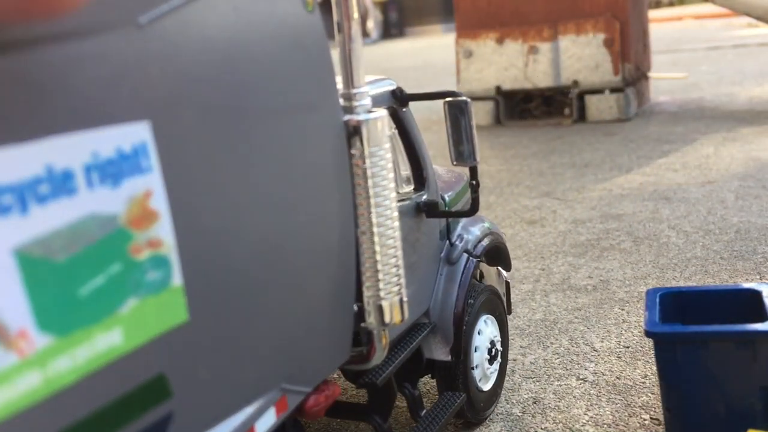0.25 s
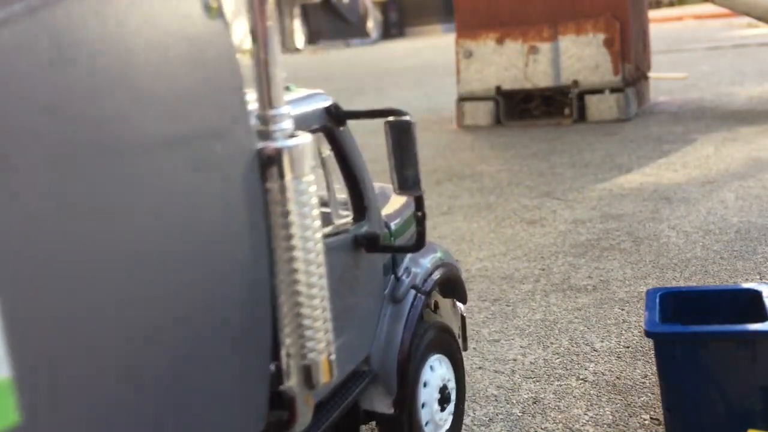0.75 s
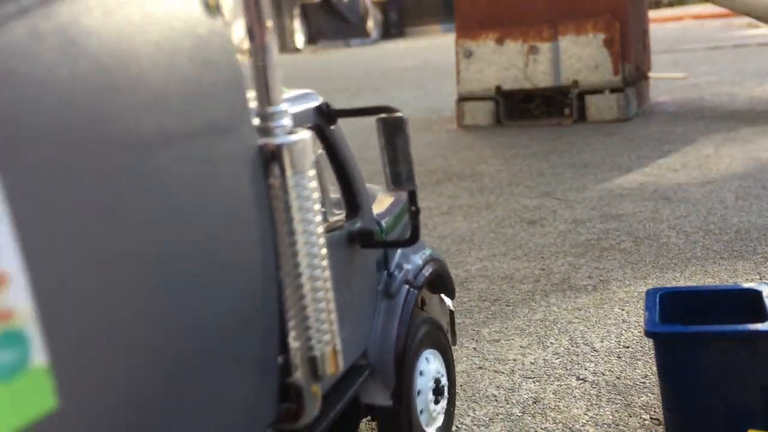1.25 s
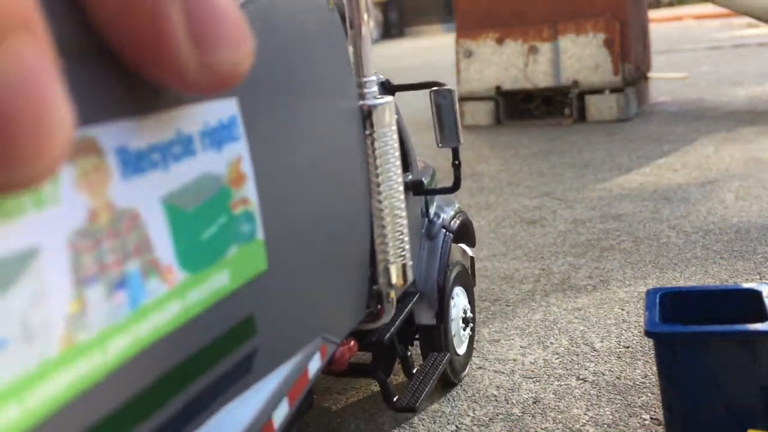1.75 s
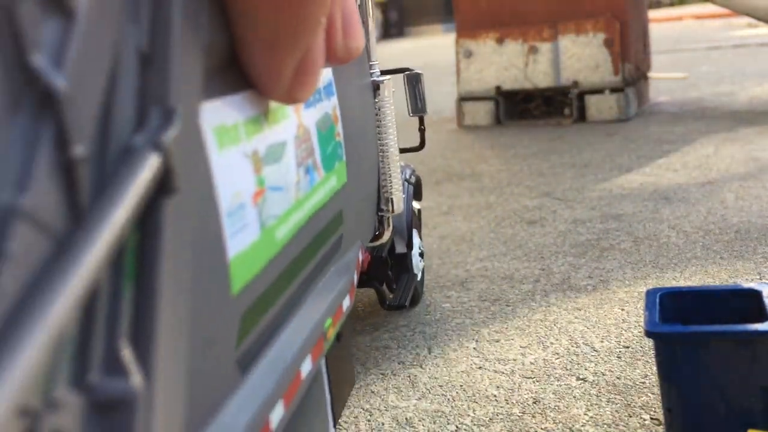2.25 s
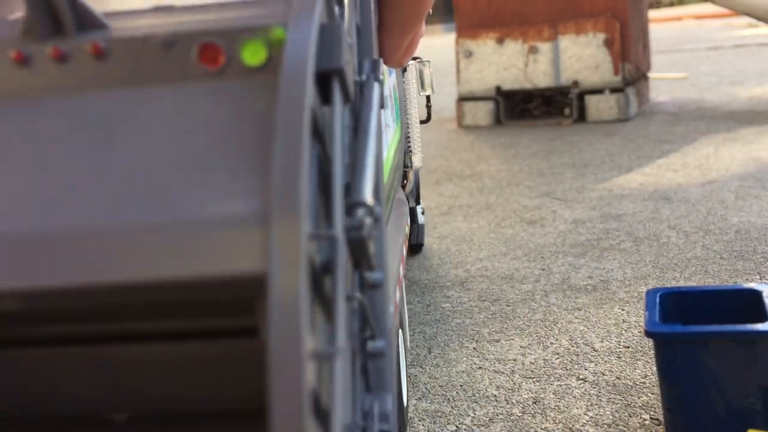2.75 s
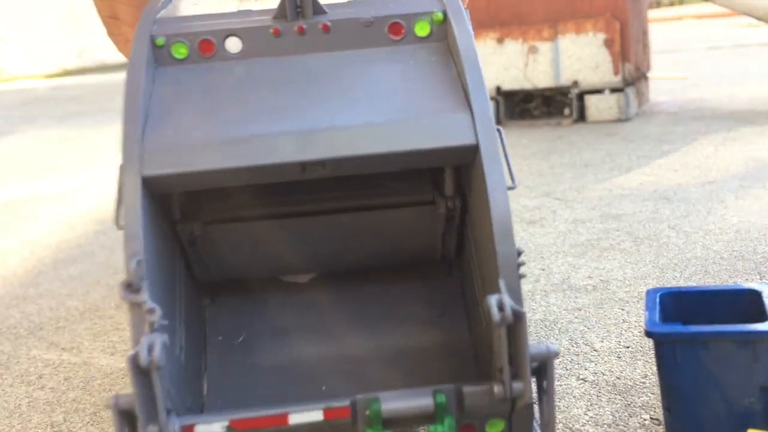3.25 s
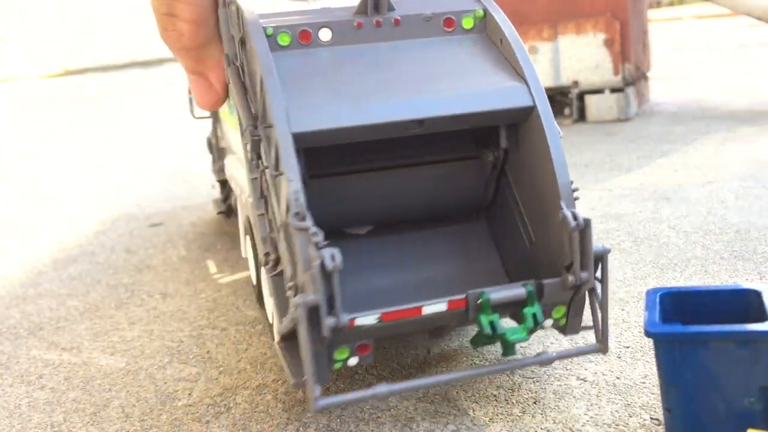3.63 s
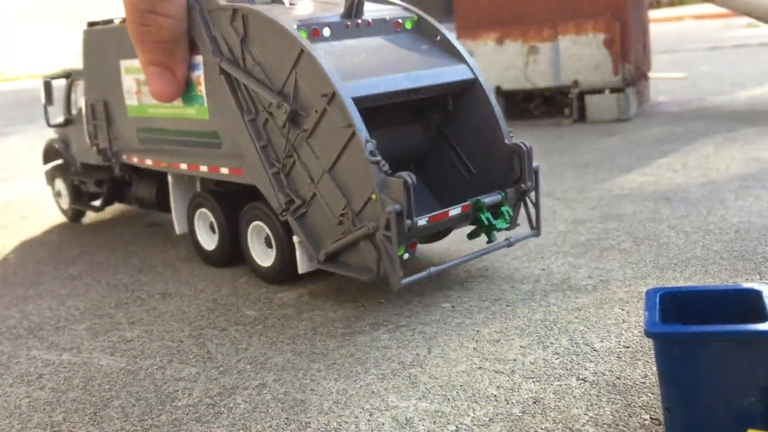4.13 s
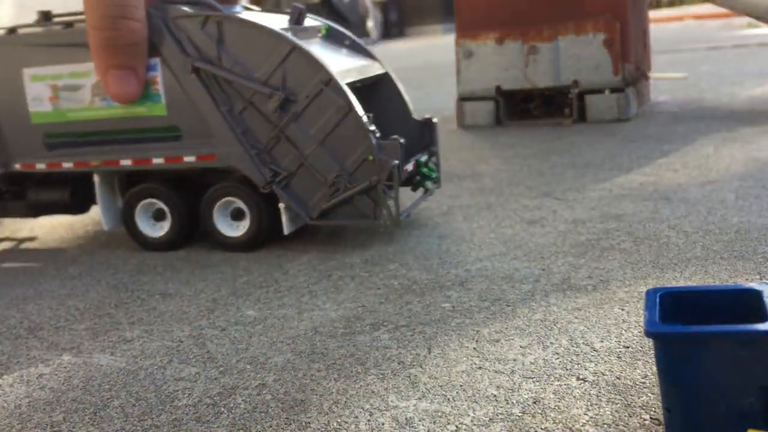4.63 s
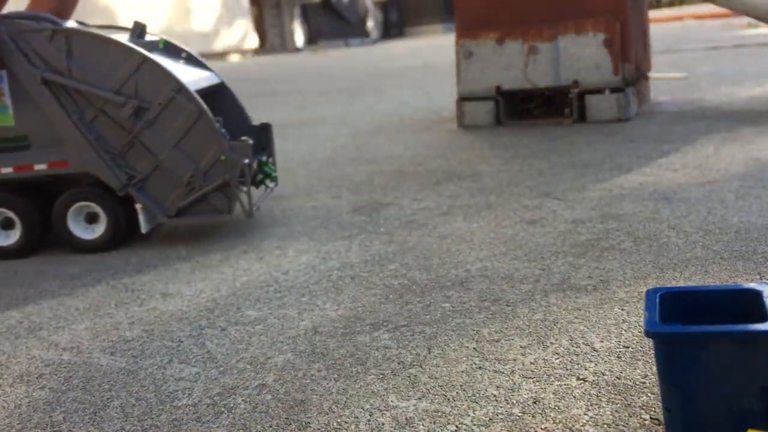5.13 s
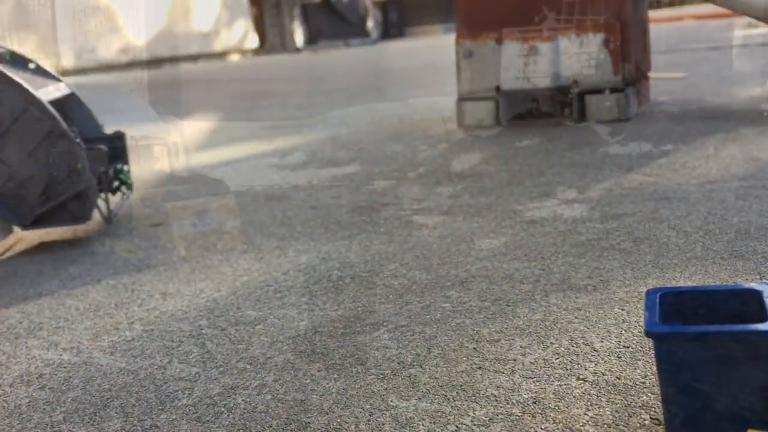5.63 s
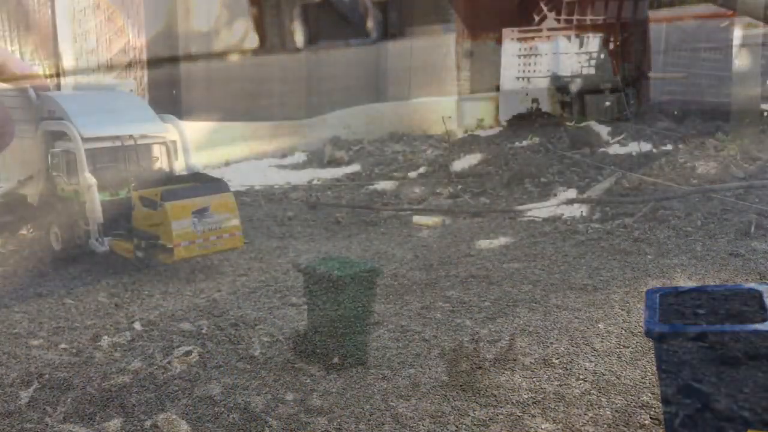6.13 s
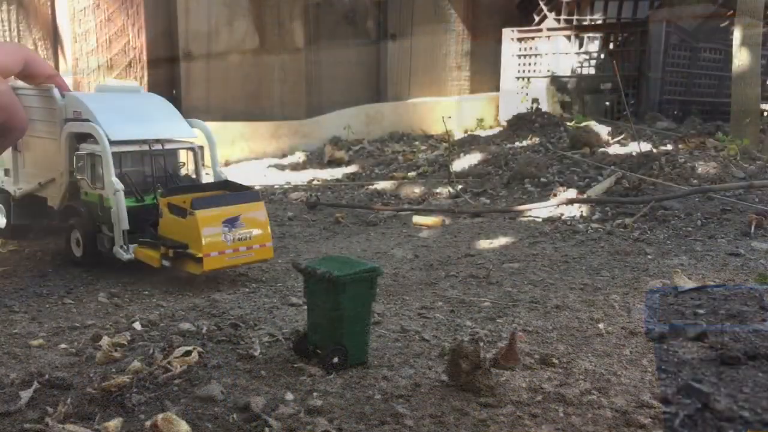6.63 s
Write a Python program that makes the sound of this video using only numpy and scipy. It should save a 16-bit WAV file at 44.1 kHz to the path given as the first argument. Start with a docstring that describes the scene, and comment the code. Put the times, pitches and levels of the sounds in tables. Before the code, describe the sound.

Close microphone, open air. Small isolated ticks break a soft rumbling background, then a brief loud clatter of hollow metal and plastic as the toy truck is shoved. Low finger thumps, soft rubbing and loose parts ticking come next. Several uneven, crunchy rolling strokes over concrete follow with gaps between, losing body as the truck recedes, until only faint knocks and distant hum remain.

```python
"""Outdoors on rough concrete, a diecast toy truck is gripped, turned and pushed in short strokes near the microphone.
Random grit clicks crunch through the resonances of its hollow body; bursts of tiny contacts make it jolt.
Loose fittings tick and single damped modes ping; handling gives dull low thumps, fingers and tyres rub softly.
Behind it lie a lumpy low rumble, a distant wash and wavering machine hums, all shaped from noise and sines."""
import sys
import numpy as np
from scipy import signal
from scipy.fft import rfft, irfft
from scipy.io import wavfile
from scipy.ndimage import uniform_filter1d

SR = 44100
rng = np.random.default_rng(int(sys.argv[2]) if len(sys.argv) > 2 else 0)


def put_to_file(sound):
    """Save the sound as 16-bit audio at rate SR, in the file named by the first command-line argument."""
    columns = np.atleast_2d(sound).T  # one column per channel
    safe = np.clip(columns, -1, 1)
    whole_steps = np.round(safe * 32767)
    wavfile.write(sys.argv[1], SR, whole_steps.astype(np.int16))


N = 303488
TIME = np.arange(N) / SR  # s
LEAD_S = 1 / 40  # room for the swell before each contact (s)

# broad colour of the truck's hollow body: (frequency [Hz], relative level [dB])
BODY_COLOUR = [(120, -20.5), (270, -21), (345, -8), (680, -7.5), (840, -16), (1050, -3), (1550, -11),
               (1850, -14), (3700, -14), (4900, -28.5), (5700, -21), (8500, -23), (10500, -31),
               (16000, -33)]
# resonances standing on that colour: (frequency [Hz], width [Hz], lift [dB])
BODY_RESONANCES = [(369.2, 37, 9), (494.5, 12, 7), (672, 47, 2.5), (788, 10, -1.5), (996, 110, 3.5),
                   (1154, 22, 2.5), (1593, 76, 6), (1950, 40, 1), (2470, 250, 0.5), (3250, 140, 4),
                   (3730, 88, 1.5), (4330, 99, 9), (5440, 260, 7.5), (6780, 320, 3), (7930, 360, -8.5)]


def amp(db):
    """Decibels to gain."""
    return 10 ** (np.asarray(db) / 20)


def unit(x):
    """Scales to rms 1."""
    return x / np.sqrt(np.mean(x ** 2) + 1e-20)


def peaked(x, size=256):
    """Scales so that the loudest few milliseconds have rms 1."""
    return x / np.sqrt(uniform_filter1d(x ** 2, size).max() + 1e-20)


def over_time(rows):
    """Gain at every sample from (time [s], level [dB]) rows."""
    return amp(np.interp(TIME, *np.transpose(rows)))


def spells(rows, rise_db_per_s, fall_db_per_s, sag_db_per_s=0):
    """Summed gain of (start [s], end [s], level [dB]) movements: each swells, holds or sags, and dies away."""
    total = 0
    for start, end, db in rows:
        rise = rise_db_per_s * np.maximum(start - TIME, 0)
        fall = fall_db_per_s * np.maximum(TIME - end, 0)
        # the listed level is reached midway through a sag
        sag = sag_db_per_s * (np.clip(TIME, start, end) - (start + end) / 2)
        total = total + amp(db - rise - fall - sag)
    return total


def add(mix, s, sound):
    """Lays a sound into the mix at time s."""
    part = mix[max(round(s * SR), 0):][:len(sound)]
    part += sound[:len(part)]


def band(x, lo_hz, hi_hz, order=3):
    """Causal band-pass."""
    edges_hz = [lo_hz, min(hi_hz, SR / 2 - 100)]
    return signal.sosfilt(signal.butter(order, edges_hz, "band", fs=SR, output="sos"), x)


def drift(per_s):
    """Smooth chance of rms 1 that changes about per_s times a second."""
    hz = np.fft.rfftfreq(N, 1 / SR)
    return unit(irfft(rfft(rng.standard_normal(N)) * np.exp(-(hz / per_s) ** 2), N))


def ring(colour, modes=(), size=4096):
    """Minimum-phase impulse response of a broad colour with resonances standing on it, at unit energy."""
    hz = np.fft.rfftfreq(size, 1 / SR)
    colour_hz, colour_db = np.transpose(colour)
    db = np.interp(np.log(hz + 1), np.log(colour_hz), colour_db)
    for centre, width, lift in modes:
        db = db + lift / (1 + (2 * (hz - centre) / width) ** 2)
    log_gain = np.log(amp(np.r_[db, db[-2:0:-1]]))
    # the Hilbert transform of the log gain gives the phase that makes it causal
    response = np.fft.ifft(np.exp(np.conj(signal.hilbert(log_gain)))).real
    return response / np.linalg.norm(response)


def grit(per_s, spread_db):
    """Random clicks of either sign, mostly small and a few large."""
    sizes = amp(spread_db * np.minimum(rng.exponential(1, N), 4)) * rng.choice([-1, 1], N)
    return sizes * (rng.random(N) < per_s / SR)


def rolling(pushing, soft_hz=2500, crisp_db=-9, bumpy_db=2.5):
    """Grit under the wheels sounds through the resonant body, in uneven clumps."""
    grains = grit(per_s=1300, spread_db=1.5) * amp(bumpy_db * drift(71))
    # the tyres soften most contacts; a little stays crisp
    cushioned = band(grains, 100, soft_hz, order=1) + amp(crisp_db) * grains
    crunch = signal.fftconvolve(cushioned, ring(BODY_COLOUR, BODY_RESONANCES))[:N]
    return pushing * unit(crunch)


def jolts(bumping, count=24):
    """Many separate hard jolts of the body over the steady bumping of the wheels."""
    # hardest jolts: (time [s], peak level at 700-2000 Hz [dB], treble relative to that [dB])
    hard_jolts = [(2.115, -31, 0.5), (2.129, -24.5, -20.5), (2.144, -21, -5.5), (2.152, -19, -5),
                  (2.177, -17.5, 0), (2.202, -17.5, -6.5), (2.223, -20, -6), (3.447, -34.5, -5),
                  (3.466, -36, -20), (3.5, -33.5, -7.5), (3.668, -29.5, -13), (3.684, -30, -7),
                  (3.701, -24, -2.5), (3.754, -29, 0), (3.789, -19.5, -6.5), (3.848, -25.5, -7),
                  (3.88, -28, -10.5), (3.901, -25.5, -6), (3.926, -31, 1), (3.945, -26, -1.5),
                  (3.969, -27.5, -4), (3.998, -21, -2), (4.075, -24, 2), (4.32, -24, -8), (4.347, -30.5, 3),
                  (4.377, -25.5, 0.5), (4.401, -26.5, -1.5), (4.416, -32.5, -5.5), (4.446, -34.5, -8.5),
                  (4.523, -30.5, -13.5), (4.542, -25, -8.5), (4.576, -22.5, -7), (4.612, -21, -3.5),
                  (4.652, -20, -6.5), (4.738, -27.5, 0.5), (5.065, -31.5, -10.5), (5.107, -24.5, -4.5),
                  (5.127, -22, -6), (5.158, -24.5, -5), (5.195, -28.5, -2.5), (5.472, -35, -17),
                  (5.498, -27.5, -10), (5.523, -28, -12), (5.669, -29.5, -10.5), (5.697, -28, -4),
                  (5.718, -27, -7.5), (5.761, -27.5, -12.5), (5.787, -30, -4), (5.811, -32.5, -10)]
    bump_treble_db, bump_db = -7.5, 1.5  # treble relative to the middle; bumps relative to the crunch
    bumps = [jolt(bump_treble_db) for _ in range(count)]
    out = rattle(bumps, bumping * amp(bump_db), gap_s=.019, jitter=.25, spread_db=1, listed_hits=hard_jolts)
    for s, db, treble_db in hard_jolts:
        add(out, s - LEAD_S, amp(db) * jolt(treble_db))
    return out


def jolt(treble_db, bass_db=-6, decay_ms=5.04):
    """A bump shakes the loose metal and plastic against the body, at a different spot each time."""
    body = ring(BODY_COLOUR, struck(BODY_RESONANCES, spread_db=1.0, stray_db=2.5))
    bass_force = chatter(rise_ms=0.67, decay_ms=decay_ms * 2.4, tail_db=-10, tail_ms=28)
    middle_force = chatter(rise_ms=2.0, decay_ms=decay_ms, tail_db=-17.5, tail_ms=22)
    treble_force = chatter(rise_ms=0.44, decay_ms=decay_ms * 0.88, tail_db=-32.5, tail_ms=69)
    bass = band(signal.fftconvolve(bass_force, body), 150, 670)
    middle = peaked(band(signal.fftconvolve(middle_force, body), 695, 2000))
    treble = band(signal.fftconvolve(treble_force, body), 2000, 17000)
    sides = amp(bass_db) * unit(bass) + amp(treble_db) * unit(treble)
    return middle + middle.std() * sides


def receding(x, boom_hz=450):
    """The body's lowest resonances follow its nearness to the microphone."""
    # boom of the body, thinner when farther off: (time [s], level [dB])
    nearness = [(2.2, 2.5), (3.5, 0.5), (3.9, 0.5), (4.5, -4.5), (5.1, -5.5), (5.8, -3.5)]
    boom = signal.sosfiltfilt(signal.butter(4, boom_hz, fs=SR, output="sos"), x)
    return x + boom * (over_time(nearness) - 1)


def ticks(turning, count=16):
    """Separate ticks of the loose fittings, clear to very faint, and random faint ticks during turns."""
    # separate ticks: (time [s], peak level at about 1300-5000 Hz [dB], treble relative to that [dB])
    separate_ticks = [(1.0373, -32.5, -7), (1.179, -44, -15), (1.8653, -49, -15), (1.8842, -42, -14),
                      (1.9401, -44.5, -16), (1.906, -35.5, -3), (2.0114, -42, -14.5), (2.5945, -48.5, -10),
                      (2.648, -38, -8), (2.6697, -40, -7), (2.6862, -38, -0.5), (3.1868, -41.5, -11),
                      (3.2625, -38, -16), (3.321, -41.5, -12), (3.3497, -41.5, -6), (3.624, -38.5, -37),
                      (3.6465, -40.5, -26.5), (4.173, -39.5, -4.5), (4.227, -34.5, -12.5),
                      (4.903, -66, -28), (4.9475, -45.5, -27), (6.005, -60, -12), (6.6988, -53.5, -20),
                      (6.7773, -51.5, -3.5)]
    # a light touch lets the fittings ring more freely
    faint = [tick(treble_db=-8.5, ringing=2.4) for _ in range(count)]
    out = rattle(faint, turning, gap_s=.015, jitter=0.36, spread_db=9, listed_hits=separate_ticks)
    for s, db, treble_db in separate_ticks:
        add(out, s - LEAD_S, amp(db) * tick(treble_db))
    return out


def tick(treble_db, ringing=1, bass_db=1.5):
    """A single light contact rings the small fittings, with the body under it."""
    # broad colour of the fittings: (frequency [Hz], relative level [dB])
    fitting_colour = [(200, -15), (380, -10.5), (600, -4.5), (1050, -2), (1800, -1), (3200, -7),
                      (5200, -10.5), (7500, -11.5), (10000, -13.5), (16000, -24.5)]
    # their resonances, before the ringing factor: (frequency [Hz], width [Hz], lift [dB])
    fitting_resonances = [(2254, 220, 6.5), (4130, 570, 3.5), (6200, 220, 2.5), (7070, 250, 3.5)]
    modes = [(hz, width, lift * ringing) for hz, width, lift in fitting_resonances]
    fittings = ring(fitting_colour, struck(modes, spread_db=0.9, stray_db=3.0))
    force = chatter(rise_ms=0.66, decay_ms=2.0, tail_db=-25.5, tail_ms=21, swell_db=-25.0, swell_ms=8.8)
    contact = signal.fftconvolve(force, fittings)
    middle = peaked(band(contact, 1200, 6200))
    bass, treble = band(contact, 340, 1400), band(contact, 5000, 18000)
    sides = amp(bass_db) * unit(bass) + amp(treble_db) * unit(treble)
    return middle + middle.std() * sides


def chatter(rise_ms, decay_ms, tail_db, tail_ms, swell_db=-15, swell_ms=1.2, grainy_db=3, size=6000):
    """A short swell of grainy noise, a flurry of tiny contacts of uneven size, then a weak diffuse tail."""
    ms = (np.arange(size) / SR - LEAD_S) * 1000
    after = np.maximum(ms, 0)
    fall = np.exp(-after / max(decay_ms, .5)) + amp(tail_db) * np.exp(-after / tail_ms)
    flurry = (1 - np.exp(-after / rise_ms)) ** 2 * fall
    swell = amp(swell_db) * np.exp(-abs(ms) / swell_ms)
    grains = rng.standard_normal(size) * amp(grainy_db * rng.standard_normal(size))
    return grains * (flurry + swell)


def struck(modes, spread_db=3.0, stray_db=5, stray_width=0.071, count=22):
    """Each point of contact excites the modes unequally and raises or lowers many others at random."""
    own = [(hz, width, lift + spread_db * rng.standard_normal()) for hz, width, lift in modes]
    others = np.geomspace(450, 14000, count) * np.exp(rng.uniform(-.1, .1, count))
    return own + [(hz, stray_width * hz, stray_db * rng.standard_normal()) for hz in others]


def rattle(contacts, gain, gap_s, jitter, spread_db, listed_hits, count=400):
    """Contacts recur at a loose pace, as strong as the movement; they leave room around each listed hit."""
    clear_gaps = .68  # room before and after a listed hit, in gaps between contacts
    late, size, which = np.transpose(rng.uniform(-1, 1, (count, 3)))
    times = gap_s * (np.arange(count) + jitter * late)
    listed_s = np.array([row[0] for row in listed_hits])
    out = np.zeros(N)
    for s, db, k in zip(times, spread_db * size, np.argsort(which) % len(contacts)):
        if LEAD_S < s < TIME[-1] and abs(listed_s - s).min() > clear_gaps * gap_s:
            add(out, s - LEAD_S, gain[int(s * SR)] * amp(db) * contacts[k])
    return out


def pings(rise_s=0.00037, size=4000):
    """Each knock rings one exponentially damped mode of the truck alone."""
    # modes that can ring alone, by part: (pitch [Hz], decay [ms])
    part_modes = {"hollow": (373, 16), "low panel": (603, 7), "mid panel": (720, 4),
                  "high panel": (1090, 4.6), "fitting": (2310, 5), "small fitting": (4240, 5.5)}
    # knocks: (time [s], peak level [dB], part)
    knocks = [(.683, -42, "mid panel"), (1.038, -42, "hollow"), (1.185, -41.5, "mid panel"),
              (1.195, -47, "fitting"), (1.279, -51.5, "fitting"), (1.312, -57, "small fitting"),
              (1.373, -59.5, "fitting"), (1.716, -49, "high panel"), (1.925, -30, "low panel"),
              (2.239, -19.5, "high panel"), (2.245, -32, "hollow"), (3.022, -44.5, "high panel"),
              (3.504, -31.5, "hollow"), (4.207, -49, "fitting"), (4.26, -34, "high panel"),
              (4.904, -41, "high panel"), (4.946, -38, "high panel"), (5.386, -44.5, "high panel"),
              (6.005, -51, "high panel"), (6.696, -47.5, "mid panel"), (6.824, -47.5, "mid panel"),
              (6.848, -48.5, "low panel")]
    out, t = np.zeros(N), np.arange(size) / SR
    for s, db, part in knocks:
        hz, decay_ms = part_modes[part]
        envelope = np.exp(-t * 1000 / decay_ms) * (1 - np.exp(-t / rise_s))
        add(out, s, amp(db) * peaked(np.sin(2 * np.pi * hz * t) * envelope))
    return out


def thumps(swell_ms=4.83, rub_db=-10, size=5000):
    """Soft pushes of the hand: a brief swell of bass with dull rubbing."""
    # dull handling thumps: (time [s], peak level [dB], pitch [Hz])
    pushes = [(1.484, -40, 135), (1.768, -27, 74), (1.864, -36, 80), (1.895, -32.5, 138), (1.93, -34, 70),
              (2.146, -29.5, 143), (2.195, -25.5, 141), (2.282, -30, 91), (2.333, -31.5, 62),
              (2.422, -24, 115.4), (2.448, -25.5, 173), (2.47, -20, 54), (2.573, -26, 73),
              (2.654, -21.5, 103), (2.672, -27.5, 81), (2.806, -28.5, 153), (2.839, -31.5, 89),
              (4.299, -32, 93), (4.327, -25.5, 57.7), (4.357, -32, 82), (5.206, -32.5, 55.4),
              (6.12, -39.5, 65.2)]
    out, t = np.zeros(N), np.arange(size) / SR
    swells = t * 1000 / swell_ms
    for s, db, hz in pushes:
        rub = unit(band(rng.standard_normal(size), 120, 290))
        push = (np.sin(2 * np.pi * hz * t) + amp(rub_db) * rub) * swells * np.exp(-swells)
        add(out, s, amp(db) * peaked(push))
    return out


def rubbing(pushing, uneven_db=5.0):
    """Fingers and tyres slide unevenly over many small grains; loose grains on the ground rustle."""
    # colour of a rub: (frequency [Hz], relative level [dB])
    rub_colour = [(150, -33), (400, 2.5), (650, -3.5), (1100, 4), (1600, -10), (3000, -23), (8000, -34),
                  (16000, -40.5)]
    # soft rubs of fingers and tyres: (start [s], end [s], level [dB])
    rubs = [(1.77, 1.85, -60.5), (1.88, 1.94, -49.5), (2.0, 2.04, -57), (2.4, 2.44, -54),
            (2.56, 2.75, -56.5), (2.93, 2.96, -55), (3.01, 3.12, -58.5), (3.15, 3.2, -46.5),
            (3.26, 3.5, -64.5), (4.9, 5.05, -50.5), (5.3, 5.88, -67), (6.7, 6.79, -64)]
    # loose ground is stirred: (start [s], end [s], level [dB])
    rustles = [(5.055, 5.2, -58.5), (6.3, 6.32, -66.5), (6.4, 6.88, -77)]
    rub_edge_db_per_s, rustle_edge_db_per_s = 209.5, 249  # how fast each comes and goes
    wheel_rustle_db = -25.5  # rolling stirs the ground too, relative to the crunch
    rub = signal.fftconvolve(grit(per_s=1400, spread_db=4.0), ring(rub_colour))[:N]
    rub = rub * amp(uneven_db * drift(18))
    rustle = band(grit(per_s=2200, spread_db=2.5), 5500, 14000)
    rubbed = spells(rubs, rub_edge_db_per_s, rub_edge_db_per_s)
    stirred = spells(rustles, rustle_edge_db_per_s, rustle_edge_db_per_s) + amp(wheel_rustle_db) * pushing
    return unit(rub) * rubbed + unit(rustle) * stirred


def outdoors(split_hz=300, lumps_db=4.0, waver=0.049, fade_s=0.31):
    """Noise shaped to a lumpy low rumble and a smooth distant wash, with wavering hums that come and go."""
    # colour of the outdoor air: (frequency [Hz], relative level per Hz [dB])
    air_colour = [(12, -49.5), (20, -24.5), (50, 1.5), (70, -1.5), (91, -6), (127, -0.5), (158, -7.5),
                  (193, -5.5), (377, -30), (590, -31.5), (698, -28.5), (923, -29), (1610, -40.5),
                  (9140, -55.5), (16000, -61)]
    # low rumble before its lumps: (time [s], level [dB])
    rumble_level = [(0, -47.5), (1.5, -50.5), (2.5, -50.5), (3.4, -50), (3.75, -51), (5.0, -53),
                    (5.9, -53.5), (6.35, -57), (6.88, -56)]
    # distant wash before its slight unevenness: (time [s], level [dB])
    wash_level = [(0, -56), (.6, -54.5), (1.5, -56), (3.0, -57), (5.4, -56.5), (6.0, -60.5), (6.5, -62.5),
                  (6.88, -56.5)]
    # distant machines, before wavering: (mean pitch [Hz], level [dB], start [s], end [s])
    machines = [(65.8, -50.5, 1, 3.94), (127, -53.5, 1, 2.3), (185, -64, 2, 2.0), (146.1, -56, 2.5, 6.1),
                (72, -59.5, 0.5, 7)]
    air = signal.fftconvolve(rng.standard_normal(N + 4096), ring(air_colour))[4096:][:N]
    rumble = unit(band(air, 26, split_hz)) * over_time(rumble_level) * amp(lumps_db * drift(6.3))
    wash = unit(band(air, split_hz, 19000)) * over_time(wash_level) * amp(1.2 * drift(6))
    out = rumble + wash
    for hz, db, start, end in machines:
        running = np.interp(TIME, [start - fade_s, start, end, end + fade_s], [0, 1, 1, 0])
        phase = 2 * np.pi * np.cumsum(hz * (1 + waver * drift(12))) / SR
        out += amp(db + 1.4 * drift(0.91)) * running * unit(np.sin(phase))
    return out


def scene():
    """The truck close by, in the open air: pushes drive the wheels and body, turns shake the fittings."""
    # pushes over the concrete: (full speed from [s], until [s], crunch level midway [dB])
    strokes = [(2.135, 2.23, -34.5), (3.425, 3.505, -41.5), (3.695, 3.83, -25.5), (3.93, 4.11, -28),
               (4.31, 4.405, -29), (4.56, 4.755, -27), (5.085, 5.205, -29), (5.5, 5.54, -36),
               (5.68, 5.795, -38.5)]
    # fingers turn and shift the truck: (start [s], end [s], level of the rattling fittings [dB])
    turns = [(1.89, 2.04, -51), (2.58, 2.73, -53.5), (3.19, 3.29, -50.5), (3.325, 3.38, -47.5),
             (3.41, 3.51, -40), (3.57, 3.65, -53.5), (4.16, 4.225, -44.5)]
    sag_db_per_s = 13.5  # each push sags a little
    pushing = spells(strokes, rise_db_per_s=479.5, fall_db_per_s=372, sag_db_per_s=sag_db_per_s)
    # steeper edges: the wheels bump only near full speed
    bumping = spells(strokes, rise_db_per_s=904.5, fall_db_per_s=904.5, sag_db_per_s=sag_db_per_s)
    turning = spells(turns, rise_db_per_s=598, fall_db_per_s=498.5)
    body = receding(rolling(pushing) + jolts(bumping))
    truck = body + ticks(turning) + pings()
    handling = thumps() + rubbing(pushing)
    return (truck + handling + outdoors())[None]


def record(dry, low_cut_hz=36, edge_hz=16300):
    """The microphone's steep bass roll-off and the recorder's band limit."""
    low_cut = signal.butter(N=6, Wn=low_cut_hz, btype="high", fs=SR, output="sos")
    band_limit = signal.firwin(511, edge_hz, window=("kaiser", 9), fs=SR)
    return signal.oaconvolve(signal.sosfilt(low_cut, dry), band_limit[None], "same")


dry = scene()
out = record(dry)
put_to_file(out)
```